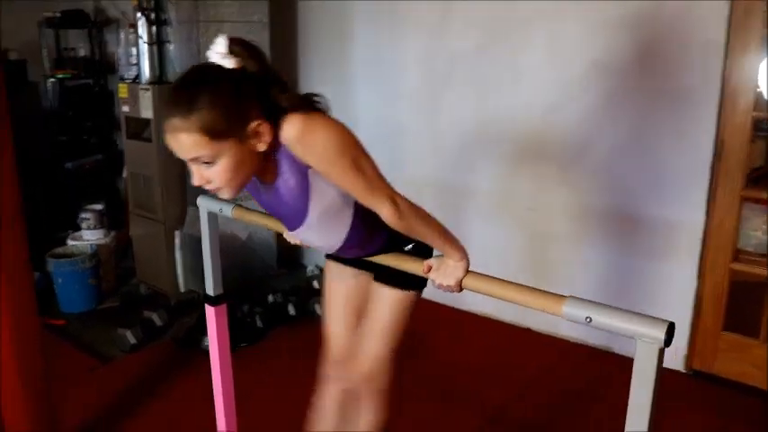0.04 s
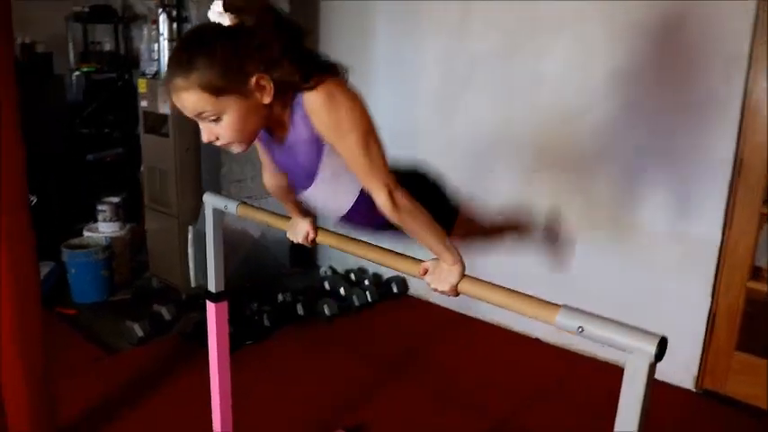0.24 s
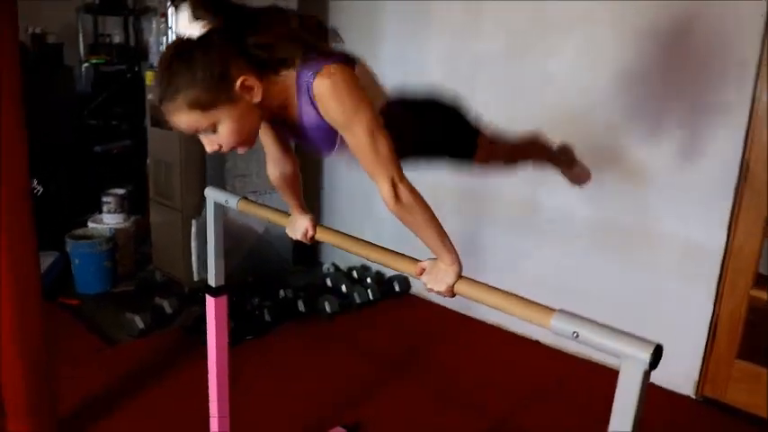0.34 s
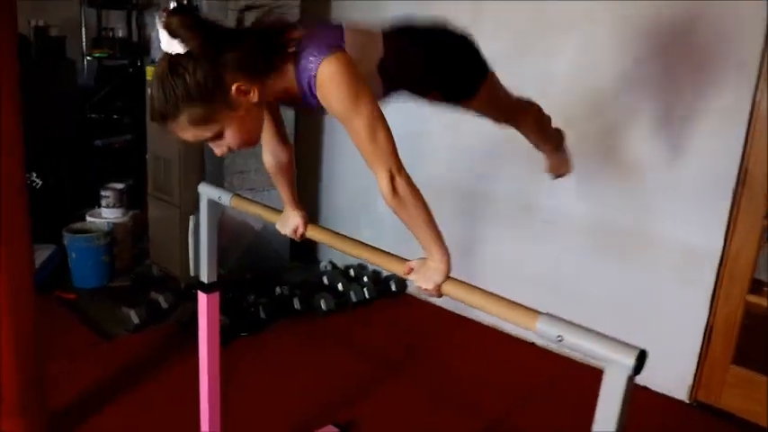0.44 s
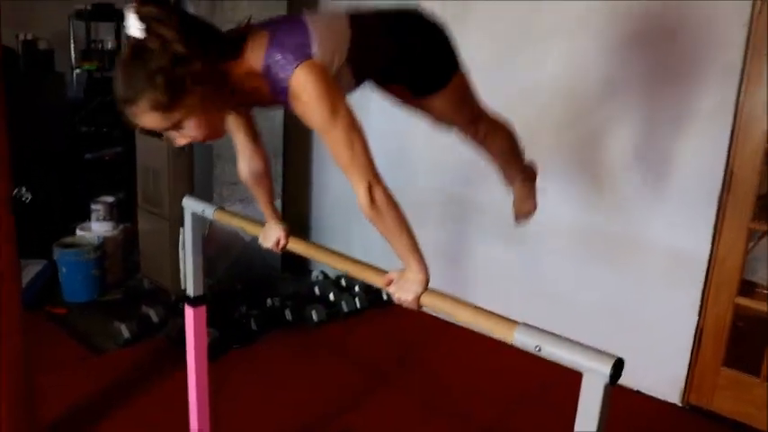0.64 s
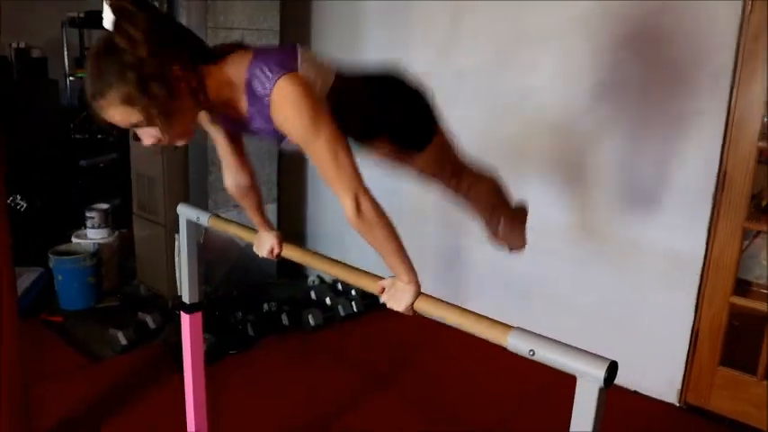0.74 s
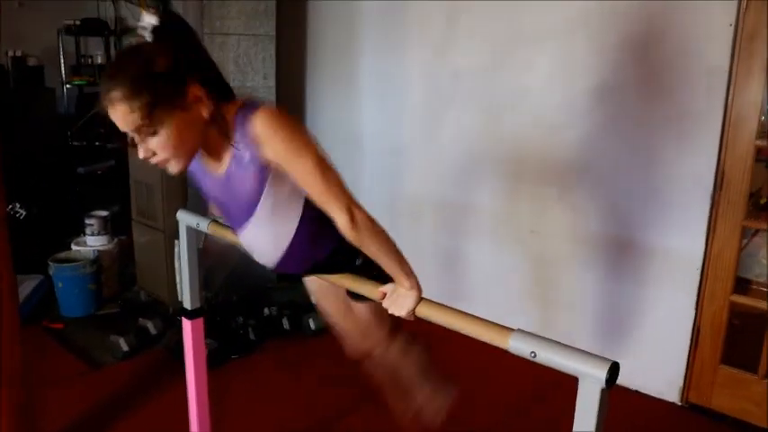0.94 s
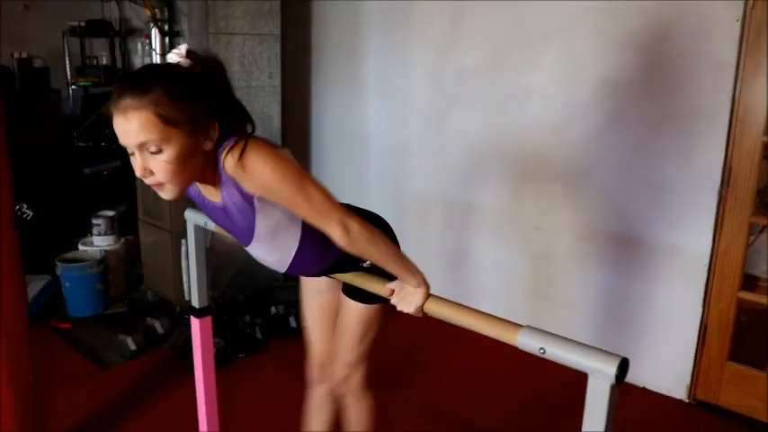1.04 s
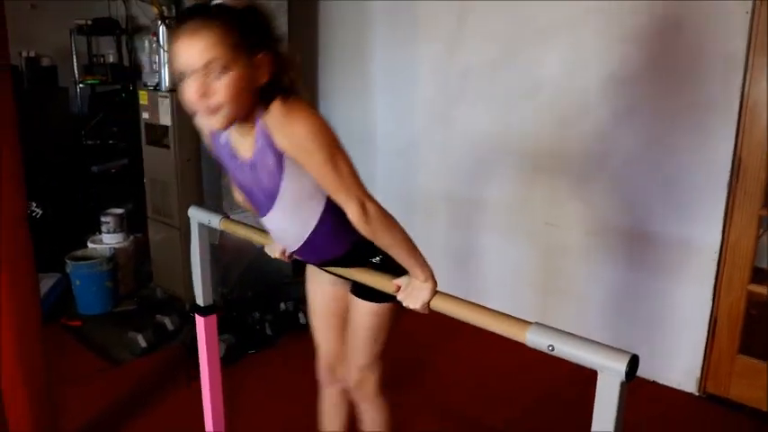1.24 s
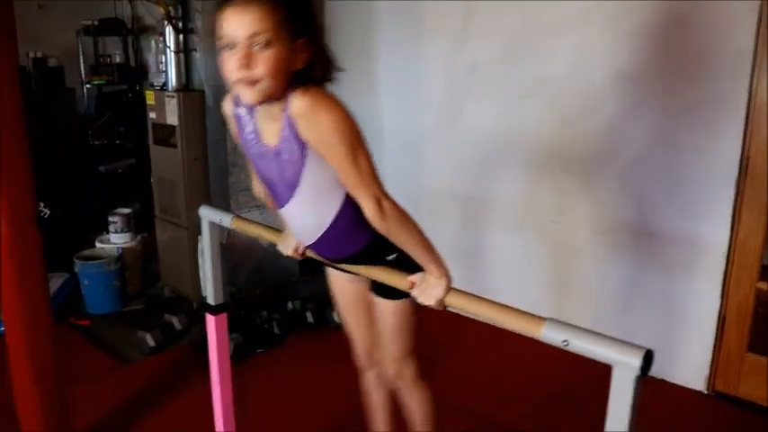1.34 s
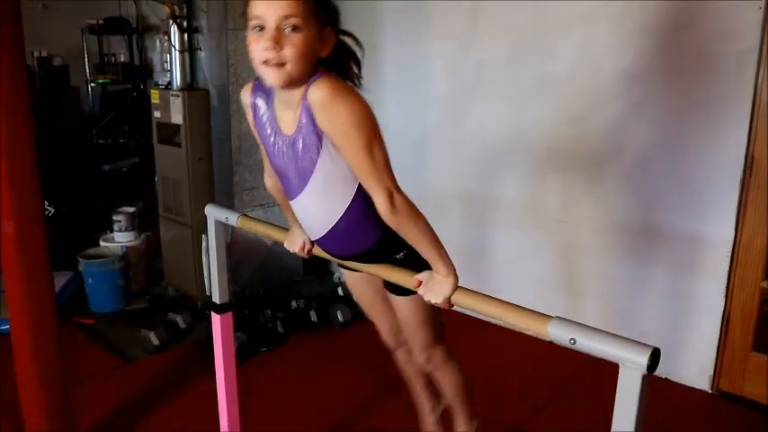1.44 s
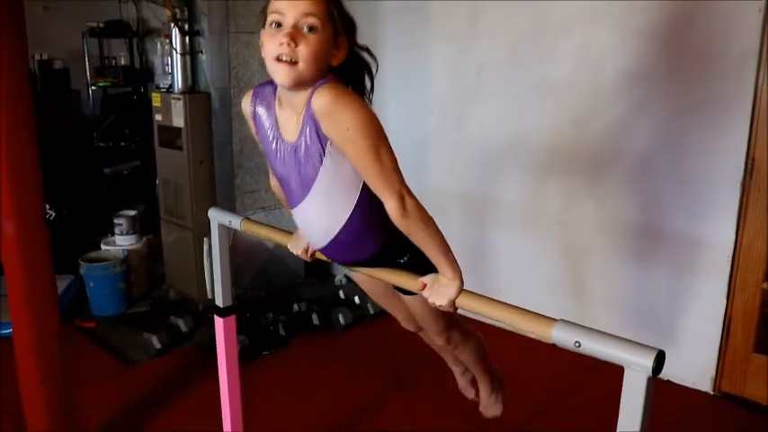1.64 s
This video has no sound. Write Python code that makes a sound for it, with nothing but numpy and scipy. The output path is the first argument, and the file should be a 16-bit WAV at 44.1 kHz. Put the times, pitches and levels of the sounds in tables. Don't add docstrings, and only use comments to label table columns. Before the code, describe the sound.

Hard metallic knock of a gymnastics bar frame, then a short squeak, dull wood knocks and a landing clank

```python
import sys
import numpy as np
from scipy import signal
from scipy.fft import rfft, irfft, next_fast_len
from scipy.io import wavfile
from scipy.ndimage import map_coordinates

SR = 44100
rng = np.random.default_rng(int(sys.argv[2]) if len(sys.argv) > 2 else 0)


def output_pcm(signal):
    pcm = np.clip(np.atleast_2d(signal).T, -1, 1) * 32767
    wavfile.write(sys.argv[1], SR, np.round(pcm).astype(np.int16))


def voltage_ratio(decibels):
    exponent = np.asarray(decibels, float) / 20
    return 10 ** exponent


N = 74970

# f/Hz, level/dB, t60/s
NEAR_STEEL = [(405, 2, 0.047), (423, -5.5, 0.028), (508, -10, 0.15), (683, -6, 0.34), (716, -4, 0.23),
              (1087, -21, 0.63), (1689, -9, 0.35), (2240, -18, 0.36), (2874, -27, 0.28), (3810, -32, 0.32),
              (4015, 5.5, 0.035)]
# f/Hz, level/dB, t60/s
TAPPED_FRAME = [(216, -7.5, 0.19), (700, -21, .15), (1062, 1, 0.07), (2360, -5.5, 0.065), (4220, -19, .04)]


def unit(x):
    return x / np.sqrt(np.mean(x ** 2) + 1e-20)


def along(points, hz):
    f, v = np.transpose(points)
    return np.interp(np.log(hz + 1), np.log(f + 1), v)


def curves(rows):
    s, *cols = np.transpose(rows)
    return [np.interp(np.arange(N) / SR, s, c) for c in cols]


def wobble(rate):
    return map_coordinates(rng.standard_normal(128), [np.arange(SR // 2) * min(rate, 240) / SR])


def coloured(x, spectrum):
    size = 4096
    log_gain = along(spectrum, np.fft.rfftfreq(size, 1 / SR)) * np.log(10) / 20
    cepstrum = irfft(log_gain, size)
    cepstrum[1:size // 2] *= 2
    cepstrum[size // 2 + 1:] = 0
    h = irfft(np.exp(rfft(cepstrum)), size)
    return signal.fftconvolve(x, h / np.linalg.norm(h))[:len(x)]


def tail(t60s):
    hz, t, z = signal.stft(rng.standard_normal(SR // 2), SR, nperseg=128)
    t60 = np.maximum(along(t60s, hz), .02)[:, None]
    return signal.istft(z * voltage_ratio(-60 * t / t60), SR, nperseg=128)[1][:SR // 2]


def room(x, wet_db):
    # f/Hz, t60/s
    echo_t60 = [(200, 0.54), (1000, 0.57), (4000, 0.45), (8000, 0.26), (15000, 0.23)]
    h = np.pad(tail(echo_t60), (130, 0))
    return x + voltage_ratio(wet_db) * signal.fftconvolve(x, h / np.linalg.norm(h))[:len(x)]


def knocks(rows, modes, rise_s, length, dull_db, drift, tone_db=0):
    # f/Hz, level/dB
    thump_colour = [(120, -29), (250, -9.5), (450, 1.5), (900, 0), (1400, -9.5), (2500, -11.5),
                    (5000, -36.5)]
    # f/Hz, level/dB
    clack_colour = [(700, -19.5), (1500, -17.5), (2500, -7.5), (4000, 1.5), (5500, -7.5), (9000, -9.5),
                    (13000, -14), (16000, -30)]
    # f/Hz, t60/s
    tube_t60 = [(200, 0.63), (700, 0.26), (2000, 0.53), (4500, 0.13), (8000, 0.13), (15000, 0.056)]
    ring_trim_db, crack_lag_s, crack_t60 = -7.5, .0013, .005
    out, t = np.zeros(N + 2 * SR), np.arange(SR // 2) / SR
    late = np.maximum(t - crack_lag_s, 0)
    dying = [(hz, t60 * length) for hz, t60 in tube_t60]
    bright = [(hz, db - dull_db * max(np.log2(hz / 5500), 0)) for hz, db in clack_colour]
    for s, ring_db, thump_db, clack_db, *crack_db in rows:
        luck = rng.standard_normal((len(modes), 2))
        ring = 0
        for (hz, db, t60), (level_luck, phase_luck) in zip(modes, luck):
            phase = 2 * np.pi * hz * t + 0.51 * phase_luck + drift * hz / 1000 * wobble(37.0)
            ring = ring + voltage_ratio(db + 3.3 * level_luck - 60 * t / t60) * np.sin(phase)
        crack = (late > 0) * voltage_ratio(-60 * late / crack_t60) * rng.standard_normal(len(t)) * sum(voltage_ratio(crack_db))
        thump = voltage_ratio(thump_db) * coloured(tail(dying), thump_colour)
        clack = voltage_ratio(clack_db) * coloured(tail(dying), bright)
        low = voltage_ratio(ring_db + ring_trim_db + tone_db) * ring + thump
        high = clack * (1 - np.exp(-late / rise_s)) + coloured(crack, bright)
        blow = low * (1 - np.exp(-t / rise_s)) + high
        out[round(s * SR):][:SR] += room(np.pad(blow, (0, SR // 2)), wet_db=-9.5)
    return out[:N]


def near_socket():
    # t/s, ring/dB, thump/dB, clack/dB, crack/dB
    blows = [
        (.2642, -11.5, -26, -19.5, -6.5),
        (.268, -21.5, -65, -35, -21),
    ]
    return knocks(blows, NEAR_STEEL, rise_s=0.0011, length=0.61, dull_db=1.0, drift=0.19)


def far_socket():
    # t/s, ring/dB, thump/dB, clack/dB, crack/dB
    blows = [(.2355, -13, -34.5, -20.5, -29)]
    # f/Hz, level/dB, t60/s
    modes = [(582, -4.5, 0.06), (1074, 2, 0.045), (1670, -7.5, 0.049), (1887, -8.5, 0.085),
             (3310, -4.5, .05), (3530, -8, .04), (5070, 3, 0.024)]
    return knocks(blows, modes, rise_s=0.0011, length=0.41, dull_db=7, drift=0.18)


def pin():
    # t/s, ring/dB, thump/dB, clack/dB, crack/dB
    blows = [
        (1.4103, -16.5, -34, -27.5, -15),
        (1.424, -29.5, -34.5, -30.5, -22.5),
    ]
    # f/Hz, level/dB, t60/s
    modes = [(510, 5, 0.014), (314, -10.5, 0.12), (421, -1.5, 0.1), (628, -3.5, 0.15), (712, -4, 0.12),
             (670, -31.5, 2.4), (1785, -15.5, 0.47), (1870, -12, 0.31), (3370, -9.5, 0.14),
             (3810, 0, 0.065), (4150, -1.5, 0.04), (4650, -15, 0.081)]
    return knocks(blows, modes, rise_s=0.0022, length=0.7, dull_db=-0.5, drift=0.38)


def squeak():
    # t/s, tube f/Hz, level/dB, overtones/dB
    course = [(.6, 803, -46, -9), (.617, 820, -27, -30), (.621, 716, -35, -5.5), (.633, 705.6, -21, -9.5),
              (.651, 716, -21, -18.5), (.677, 724, -27.5, -16.5), (.686, 725.6, -41.5, -4.5),
              (.693, 726, -34.5, -17), (.78, 721.6, -46.5, -12.5)]
    # multiple, level/dB
    orders = [(2, -4.5), (3, -5), (4, -17.5), (5, -10), (6, -24.5)]
    # f/Hz, level/dB
    scrape_colour = [(1000, 2), (2500, 5.5), (4000, -5), (7500, -9), (10000, -26), (15000, -43)]
    slip_over_tube = 1.03
    hz, db, bite_db = curves(course)
    t, start_s, end_s = np.arange(N) / SR, course[0][0], course[-1][0]

    def slow(rate):
        return np.pad(wobble(rate), (round(start_s * SR), N))[:N]

    fade = np.clip((end_s - t) / .02 + 1, 0, 1)
    gain = voltage_ratio(db) * np.sqrt(2) * (t > start_s) * fade
    turn = 2 * np.pi * np.cumsum(hz * (1 + .006 * slow(120))) / SR
    slip = 0
    for k, level_db in orders:
        rough = voltage_ratio(level_db + 4.5 * slow(91.7))
        slip = slip + rough * np.sin(k * slip_over_tube * turn + 1.1 * slow(189))
    scrape = voltage_ratio(-12.5) * coloured(rng.standard_normal(N), scrape_colour)
    tube = room(gain * np.sin(turn), wet_db=-18)
    return tube + room(gain * voltage_ratio(bite_db) * (slip + scrape), wet_db=-10)


def chatter():
    # t/s, ring/dB, thump/dB, clack/dB
    blows = [
        (.297, -37, -45, -35),
        (.314, -29, -40, -28.5),
        (.355, -45, -60, -31.5),
    ]
    return knocks(blows, NEAR_STEEL, rise_s=0.0044, length=1.0, dull_db=21, drift=0.27)


def pin_settles():
    # t/s, ring/dB, thump/dB, clack/dB
    shifts = [
        (.8685, -32, -68, -70),
        (1.428, -18.5, -59, -57),
        (1.446, -22, -49, -53),
    ]
    # f/Hz, level/dB, t60/s
    modes = [(322.5, -6.5, .11), (699, -1.5, .22), (1875, -9.5, 0.29)]
    return knocks(shifts, modes, rise_s=0.0049, length=0.4, dull_db=13, drift=0.71)


def rail():
    times = [.548, .561, .762, .790, .8675, .9663, .982, .990, 1.012, 1.038, 1.113, 1.255]
    # ring/dB, thump/dB, clack/dB, crack/dB
    levels = [(-47, -43.5, -47, -68), (-50, -57, -50, -60), (-43, -45.5, -69.5, -69),
              (-42, -46.5, -64, -69.5), (-37, -42, -50, -40), (-55, -44, -65, -57), (-37, -48, -45, -43.5),
              (-32.5, -30, -49.5, -70), (-29.5, -33.5, -46, -69), (-34, -40, -59.5, -70),
              (-31, -34.5, -38, -70), (-38, -38, -48, -70)]
    # f/Hz, level/dB, t60/s
    modes = [(107, -11, 0.11), (216, -8, 0.083), (480, -3, 0.021), (419, -3, 0.16), (600, 1, 0.059),
             (750, -8, .1), (1143, -7, 0.066)]
    rows = [(s, *db) for s, db in zip(times, levels)]
    return knocks(rows, modes, rise_s=0.0017, length=0.37, dull_db=9, drift=0.48, tone_db=4.5)


def collar():
    # t/s, ring/dB, thump/dB, clack/dB, crack/dB
    blows = [(1.0755, -27.5, -30.5, -32, -18.5)]
    # f/Hz, level/dB, t60/s
    modes = [(337, -2, 0.44), (480, -31, 0.06), (640, 2, 0.17), (1025, -8, 0.46), (1857, -3.5, 0.35),
             (2150, -2, 0.2), (4440, 5.5, 0.028)]
    return knocks(blows, modes, rise_s=0.0012, length=0.89, dull_db=11, drift=0.47)


def bolt():
    # t/s, ring/dB, thump/dB, clack/dB, crack/dB
    blows = [(1.217, -27, -35, -47, -43.5)]
    # f/Hz, level/dB, t60/s
    modes = [(208.4, -32, 0.37), (661, -8, 0.54), (1065, 0.5, 0.31), (2170, -15, 0.1), (3220, -1, 0.042)]
    return knocks(blows, modes, rise_s=0.002, length=0.6, dull_db=13, drift=1.0)


def foot():
    # t/s, ring/dB, thump/dB, clack/dB, crack/dB
    blows = [(1.345, -32.5, -42, -37.5, -42)]
    # f/Hz, level/dB, t60/s
    modes = [(633, -10, 0.24), (1638, -3, 0.069), (2040, 0.5, 0.03), (3080, 0.5, 0.054), (5200, -10, 0.022)]
    return knocks(blows, modes, rise_s=0.0009, length=0.74, dull_db=17, drift=0.57, tone_db=6.5)


def tap():
    # t/s, ring/dB, thump/dB, clack/dB, crack/dB
    blows = [(.147, -28.5, -38, -45, -50)]
    return knocks(blows, TAPPED_FRAME, rise_s=0.0021, length=0.55, dull_db=21, drift=0.99)


def tap_again():
    # t/s, ring/dB, thump/dB, clack/dB, crack/dB
    blows = [
        (.196, -34, -62, -57, -65),
        (0.9, -44, -43.5, -46.5, -38),
        (0.5, -46, -41, -42.5, -72),
    ]
    return knocks(blows, TAPPED_FRAME, rise_s=0.0012, length=0.18, dull_db=22, drift=0.61)


def rattle():
    # t/s, level/dB
    course = [(0, -49.5), (.06, -62.5), (.14, -62.5), (.3, -33.5), (.45, -43), (.57, -46.5), (.62, -53.5),
              (.8, -56.5), (.95, -59.5), (1.02, -44), (1.15, -45.5), (1.3, -48), (1.5, -50.5), (1.7, -84)]
    # f/Hz, level/dB
    colour = [(88, -76.5), (150, -28.5), (197, -3.5), (427, -9.5), (465, -0.5), (713, -3.5), (3280, -15.5),
              (9000, -32), (11700, -42.5), (19800, -120)]
    ticks_per_s = 1100
    db, = curves(course)
    happens = rng.random(N) < ticks_per_s / SR
    strength = voltage_ratio(4.9 * np.minimum(rng.exponential(size=N), 3))
    ticks = happens * strength * rng.choice([-1, 1], N)
    t = np.arange(SR // 2) / SR
    tube = voltage_ratio(-60 * t / .25) * np.sin(2 * np.pi * 718 * t)
    clatter = unit(room(coloured(ticks, colour), wet_db=7.5))
    return voltage_ratio(db) * (clatter + 0.49 * unit(signal.fftconvolve(ticks, tube)[:N]))


def sway():
    # t/s, level/dB
    course = [(0.0, -66), (0.202, -62), (0.288, -54), (0.368, -54), (0.402, -50), (0.454, -68),
              (0.96, -57.5), (1.008, -38), (1.064, -50), (1.108, -51), (1.4, -53.5), (1.472, -42),
              (1.562, -61.5), (1.7, -57.5)]
    # f/Hz, level/dB
    colour = [(12, -24), (30, 9), (50, 6), (97, 8.5), (140, -0.5), (180, -6), (230, -59), (400, -120)]
    db, = curves(course)
    return voltage_ratio(db - 6.0) * unit(coloured(rng.standard_normal(N), colour))


def hush():
    # f/Hz, level/dB
    colour = [(18, -7), (30, -3.5), (1630, -18.5), (3220, -25), (3490, -22.5), (3980, -28), (4420, -25),
              (12300, -27.5), (16000, -28)]
    return voltage_ratio(-61.5) * unit(coloured(rng.standard_normal(N), colour))


def scene():
    hits = far_socket() + near_socket() + pin() + foot() + collar() + tap() + bolt()
    hits = hits + chatter() + rail() + tap_again() + pin_settles()
    background = hush()
    return (hits + squeak() + rattle() + sway() + background)[None]


def roll_off(x):
    return signal.sosfilt(signal.butter(12, 16300, fs=SR, output="sos"), x)


def record(dry):
    top_hz, bottom_hz = 16620, 36
    m = next_fast_len(N + SR // 2)
    hz = np.fft.rfftfreq(m, 1 / SR)
    gain = (hz < top_hz) / (1 + (bottom_hz / (hz + 1)) ** 4)
    mix = irfft(rfft(dry, m) * gain, m)[:, :N]
    return roll_off(mix)


dry = scene()
out = record(dry)
output_pcm(out)
```